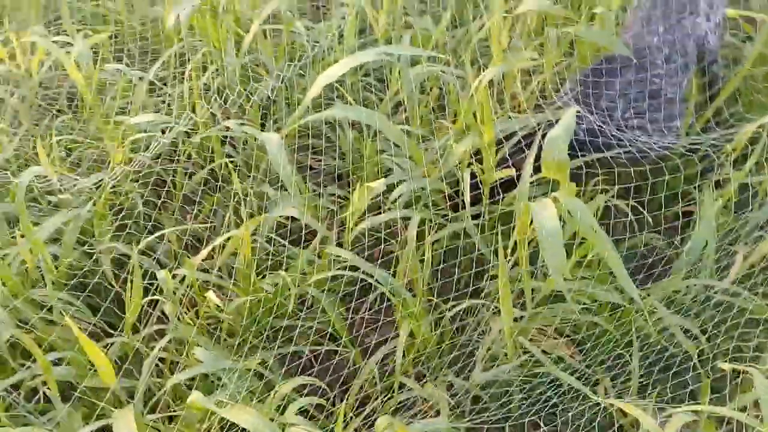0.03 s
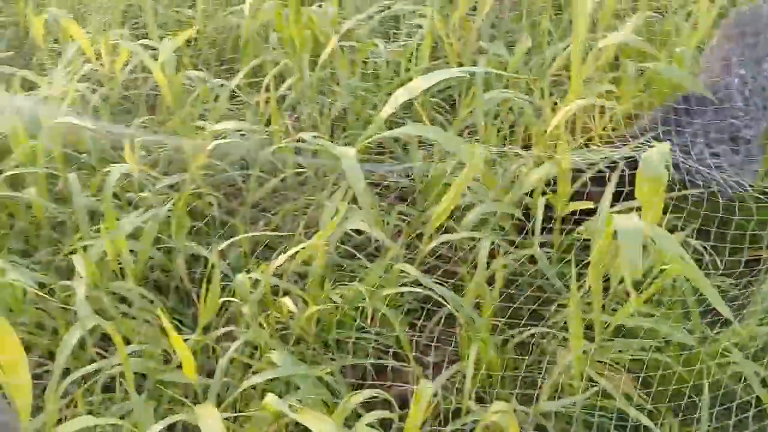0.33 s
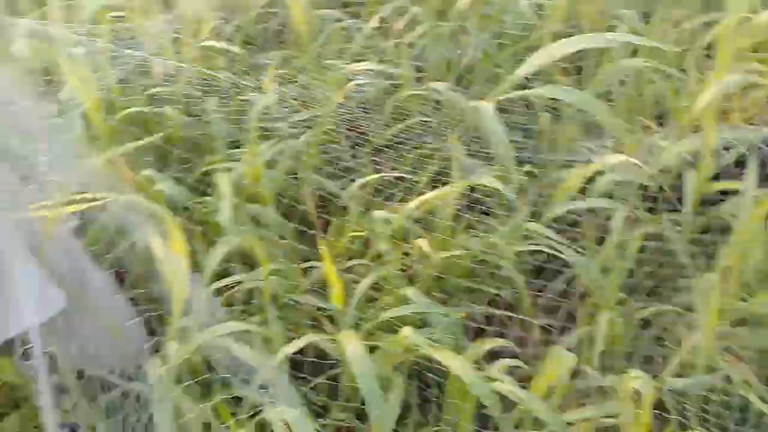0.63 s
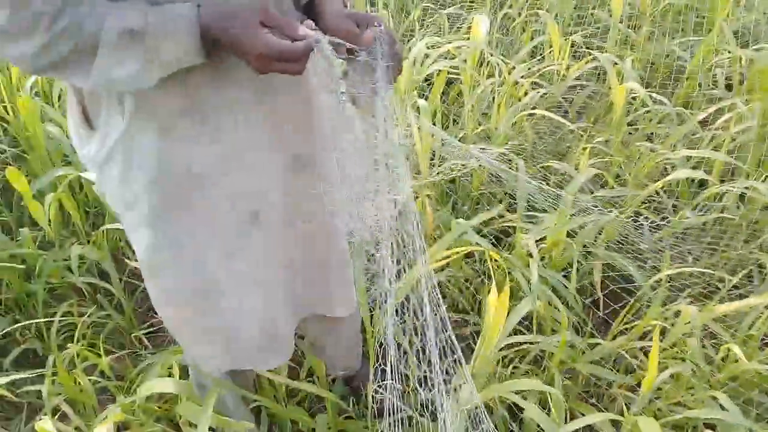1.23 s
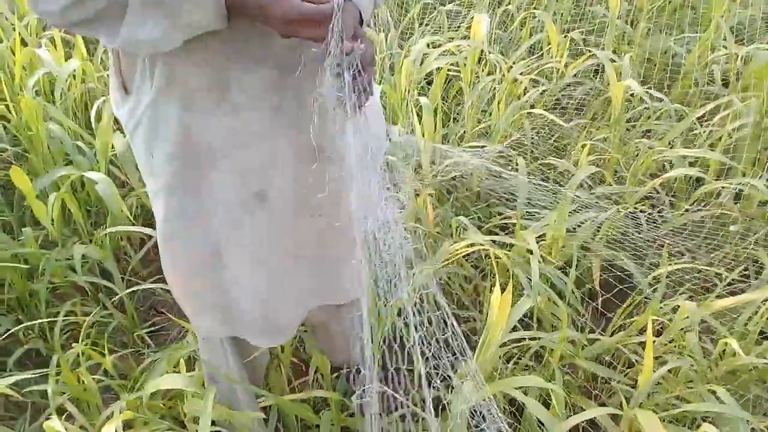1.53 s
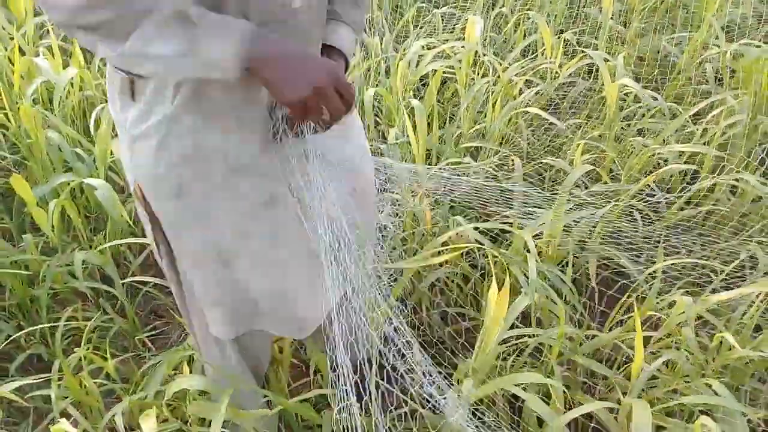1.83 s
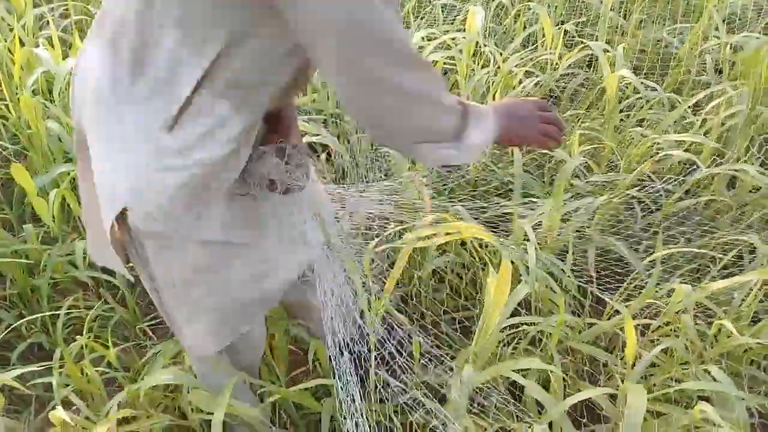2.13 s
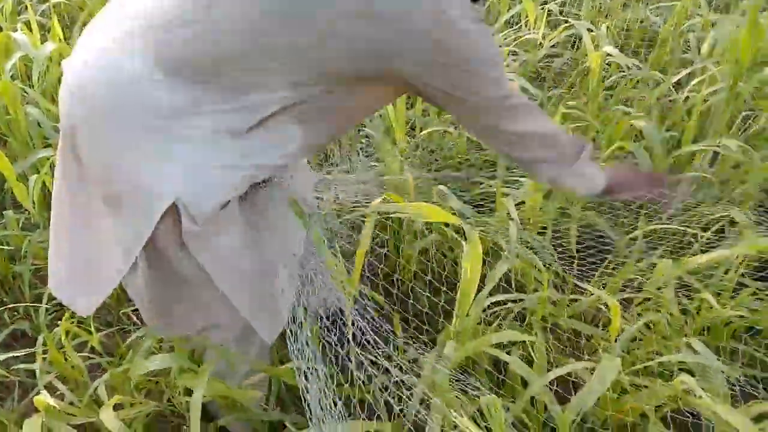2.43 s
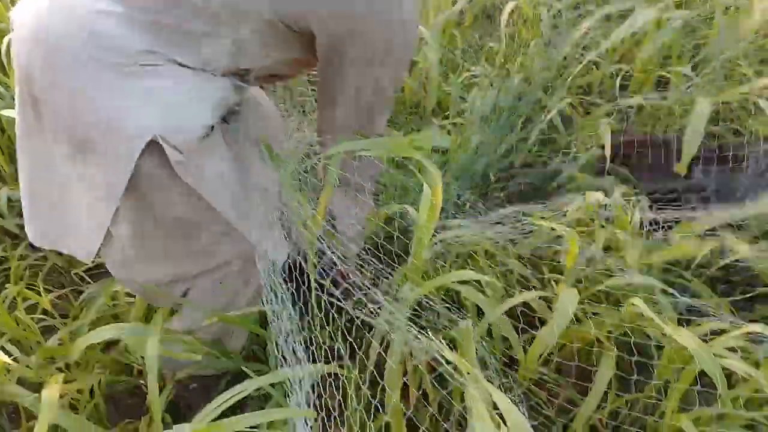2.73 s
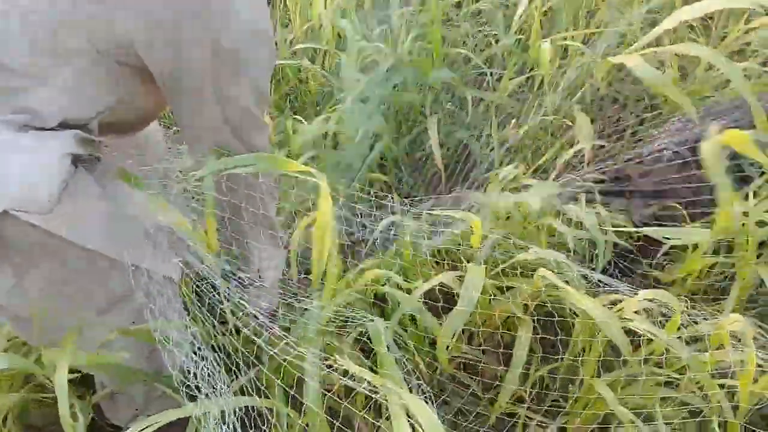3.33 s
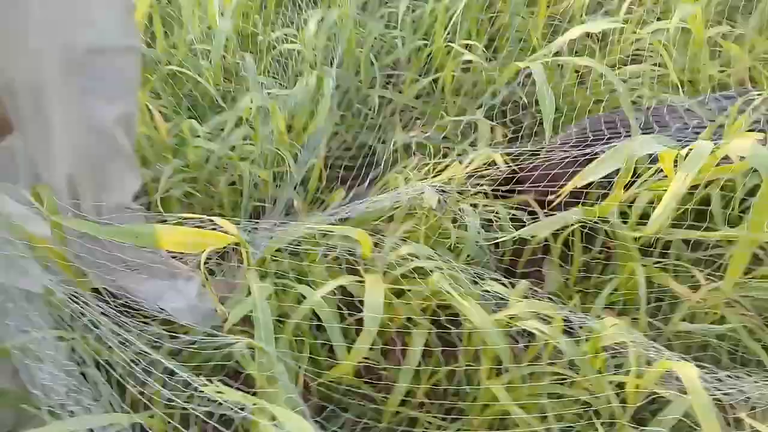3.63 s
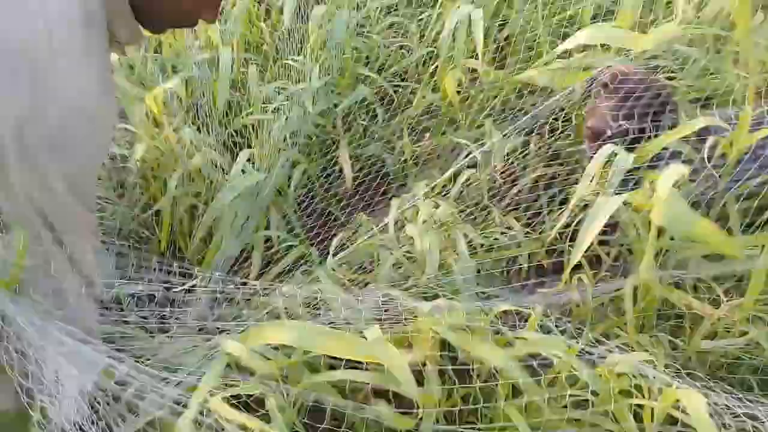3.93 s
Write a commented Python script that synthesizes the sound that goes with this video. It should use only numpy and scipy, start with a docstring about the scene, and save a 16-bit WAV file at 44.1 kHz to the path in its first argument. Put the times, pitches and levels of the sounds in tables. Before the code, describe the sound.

Rustling of a net pulled through young crops, heard close up outdoors. Light scraping and low wind thumps come first, then a quiet moment, a burst of crackling leaves and snapping stems, and a brief sharp rip.

```python
"""A net snags in young grain

A nylon net rubs and flicks over the leaves while a puff of wind buffets the microphone.
After a lull an arm sweeps into the crop: leaves rustle, stalks snap, and the snagged net tears free
in one short loud rip. Rubbing and tearing are many tiny clicks over hiss; thumps are fading tones."""
import sys
import numpy as np
from scipy import signal
from scipy.fft import rfft, irfft, next_fast_len
from scipy.io import wavfile
from scipy.ndimage import map_coordinates

SR = 44100
rng = np.random.default_rng(int(sys.argv[2]) if len(sys.argv) > 2 else 0)


def output_pcm(signal):
    """Save a mono or channel-first signal as 16-bit PCM at the path in sys.argv[1].

    Samples are clipped to [-1, 1] before scaling.
    """
    pcm = np.clip(np.atleast_2d(signal).T, -1, 1) * 32767
    wavfile.write(sys.argv[1], SR, np.round(pcm).astype(np.int16))


N = 176400  # 4 seconds
T = np.arange(N) / SR  # the time of each sample [s]


def amp(db):
    """Turn decibels into a number to multiply a sound by."""
    return 10 ** (np.asarray(db) / 20)


def unit(x):
    """Scale a sound so its average strength (rms) is 1."""
    return x / np.sqrt(np.mean(x ** 2) + 1e-20)


def level(rows, fade_db_per_s=300):
    """A loudness curve through (time [s], level [dB]) points, fading away outside them."""
    times, db = np.transpose(rows)
    seconds_outside = abs(T - np.clip(T, times[0], times[-1]))
    return amp(np.interp(T, times, db) - fade_db_per_s * seconds_outside)


def stroke(start_s, rise_s, hold_s, fall_db_per_s, db):
    """The loudness of one movement: it swells, holds and dies away."""
    seconds_falling = np.maximum(T - start_s - rise_s - hold_s, 0)
    return np.clip((T - start_s) / rise_s, 0, 1) * amp(db - fall_db_per_s * seconds_falling)


def wobble(per_s):
    """A smooth curve through per_s random values each second."""
    return map_coordinates(rng.standard_normal(int(N * per_s / SR) + 4), [T * per_s])


def coloured(x, points):
    """Shape a sound's tone colour through (frequency [Hz], level [dB]) points."""
    size = 2 * next_fast_len(len(x) // 2 + 4096)
    octave = np.log2(np.fft.rfftfreq(size, 1 / SR) + 1)
    hz, db = np.transpose(points)
    knots = np.log2(hz)
    octaves_outside = abs(octave - np.clip(octave, knots[0], knots[-1]))
    gain = amp(np.interp(octave, knots, db) - 24 * octaves_outside)
    # these steps make the filter ring only after a click, never before it
    cepstrum = irfft(np.log(np.maximum(gain, 1e-6)))
    cepstrum[1:size // 2] *= 2
    cepstrum[size // 2 + 1:] = 0
    response = np.exp(rfft(cepstrum))
    return irfft(rfft(x, size) * response, size)[:len(x)]


def noise(colour):
    """Smooth noise with the given tone colour."""
    return unit(coloured(rng.standard_normal(N), colour))


def crackle(colour, slips_per_s, spread_db, rub_db):
    """Tiny slips click, some louder than others, over the hiss of smooth rubbing."""
    sizes = amp(spread_db * np.minimum(rng.exponential(size=N), 4))
    slips = (rng.random(N) < slips_per_s / SR) * sizes * rng.choice([-1, 1], N)
    rubbing = amp(rub_db) * rng.standard_normal(N)
    return unit(coloured(unit(slips) + rubbing, colour))


def thump(start_s, db, hz, ring_s, rise_s):
    """A soft push that swings a few times, fading by 60 dB in ring_s seconds."""
    t = np.maximum(T - start_s, 0)
    swing = np.sin(2 * np.pi * hz * t) * amp(-60 * t / ring_s) * (1 - np.exp(-t / rise_s))
    return amp(db) * swing / abs(swing).max()


def field():
    """A distant rumble lies under the faint hiss of still air."""
    # tone colours of the rumble and the air (frequency [Hz], level [dB])
    rumble_colour = [(25, -10), (45, -5), (80, 0), (150, -6), (190, -17), (280, -22), (400, -22),
                     (550, -29)]
    air_colour = [(300, -2), (800, -3), (1500, 0), (2100, 2), (2900, -9), (3700, -2), (5100, -5),
                  (5800, -16), (7500, -14), (8000, -9), (8400, -1), (9000, -17), (15800, -17)]
    rumble = amp(-59) * noise(rumble_colour)
    air = amp(-67.8 + .7 * wobble(5)) * noise(air_colour)
    return rumble + air


def wind():
    """Swirling air pushes on the microphone: an uneven rumble with a few stronger thumps."""
    # strength of the puff (time [s], relative level [dB])
    puff_levels = [(0, -39), (.04, -48), (.2, -46), (.26, -39), (.45, -36), (.56, -38), (.66, -37),
                   (.72, -41), (.82, -37), (.92, -47), (1.02, -45), (1.1, -58), (1.25, -68)]
    # its deep tone colour (frequency [Hz], level [dB])
    puff_colour = [(20, -12), (45, -1), (90, 1), (140, 0), (210, -6), (300, -16), (420, -26), (600, -41)]
    # single pushes of air (time [s], peak level [dB], pitch [Hz])
    buffets = [(.245, -31, 70), (.382, -24, 100), (.503, -27, 90), (.591, -19.5, 140), (.748, -25, 185),
               (.786, -28, 140), (.848, -30, 130), (1.012, -38, 105)]
    swirl = unit(noise(puff_colour) * amp(2 * wobble(30)))
    puff = amp(-1) * level(puff_levels, fade_db_per_s=100) * swirl
    return puff + sum(thump(*buffet, ring_s=.03, rise_s=.005) for buffet in buffets)


def net():
    """The net drags over leaves, slides over hands and cloth, and is pulled twice through the crop."""
    # loudness of the drag and the slide (time [s], relative level [dB])
    drag_levels = [(0.0, -51), (0.178, -56), (0.312, -51), (0.336, -56), (0.414, -55), (0.45, -47),
                   (0.524, -59), (0.62, -63)]
    slide_levels = [(.45, -75), (.55, -64), (.7, -63.5), (.75, -55), (.92, -60), (1.15, -59), (1.27, -68),
                    (1.45, -80)]
    # the two pulls (start [s], rise [s], hold [s], fall [dB/s], level [dB])
    pull_strokes = [(3.372, .04, .04, 95, -40), (3.855, .05, .04, 60, -38.3)]
    # tone colour of each kind of rubbing (frequency [Hz], level [dB])
    drag_colour = [(300, -10), (420, -7), (600, -10), (900, -10), (1400, -4), (1650, -1), (2200, 1),
                   (2500, -3), (3000, -17), (3700, -9), (4300, -8), (6000, -11), (8400, -26), (10200, -18),
                   (12500, -23), (15800, -23)]
    slide_colour = [(250, -16), (410, 2), (600, -12), (1000, -13), (1500, -1), (2050, 0), (2350, -5),
                    (2700, -20), (3200, -24), (3700, -5), (4600, -8), (6000, -19), (7800, -16), (8400, -15),
                    (9200, -29), (11000, -22), (12300, -29), (14000, -22), (15800, -24)]
    pull_colour = [(120, -6), (220, -6), (350, -8), (500, -11), (700, -8), (1020, -7), (1300, -2),
                   (2000, -1), (3160, -9), (4280, -1), (5980, -14), (7010, -11), (8760, -18), (13900, -16),
                   (15800, -17)]
    drag = amp(-.5) * level(drag_levels) * crackle(drag_colour, slips_per_s=1200, spread_db=4, rub_db=0)
    slide = level(slide_levels) * crackle(slide_colour, slips_per_s=4000, spread_db=3, rub_db=2)
    pulling = sum(stroke(*pull) for pull in pull_strokes)
    pulls = pulling * crackle(pull_colour, slips_per_s=4000, spread_db=3, rub_db=1)
    return (drag + slide + pulls) * amp(.7 * wobble(35))


def flicks():
    """Tight strands scrape over leaves, each a short hiss around one pitch."""
    # flicking strands (time [s], level [dB], pitch [Hz], time to fade by 60 dB [s])
    strands = [(.0825, -41, 4000, .02), (.208, -48, 2200, .07), (.299, -44, 2150, .07),
               (1.708, -61.5, 3600, .07), (1.762, -59.5, 3500, .08)]
    out = np.zeros(N)
    for start_s, db, hz, fade_s in strands:
        band = signal.iirpeak(hz, Q=2, fs=SR)
        hiss = signal.lfilter(*band, rng.standard_normal(N))
        scrape = unit(signal.lfilter(*band, hiss))  # filtering twice narrows the band
        out += stroke(start_s, rise_s=.002, hold_s=0, fall_db_per_s=60 / fade_s, db=db) * scrape
    return out


def leaves():
    """Leaves rub and tick against each other; the sweep of the arm makes a fuller, rougher rustle."""
    # leaves stirred by arm and net (time [s], level [dB])
    stir_levels = [(1.9, -76), (2.1, -64), (2.2, -56), (2.32, -54.5), (2.45, -51), (2.5, -43), (2.76, -42),
                   (2.84, -44.5), (2.92, -48.5), (3.02, -46.5), (3.13, -48.5), (3.25, -53), (3.36, -54),
                   (3.5, -52), (3.6, -52), (3.66, -48), (3.78, -45), (3.84, -48), (4.0, -49)]
    # tone colours of the stirring and the sweep (frequency [Hz], level [dB])
    stir_colour = [(120, -4), (200, -4), (300, -7), (420, -11), (560, -13), (700, -9), (958, -7),
                   (1210, -7), (1680, -2), (2090, 1), (2700, -4), (3250, -11), (3860, -5), (4480, -6),
                   (6000, -17), (9000, -19), (10100, -18), (15800, -19)]
    sweep_colour = [(29, -43), (50, -13), (91, -2), (378, -6), (470, -12), (627, -5), (690, -7), (922, -3),
                    (1350, -5), (2090, 0), (4200, -8), (8650, -19), (15800, -20)]
    stirring = level(stir_levels) * amp(.6 * wobble(40))
    stir = stirring * crackle(stir_colour, slips_per_s=3000, spread_db=3, rub_db=1)
    arm = stroke(start_s=2.485, rise_s=.085, hold_s=.11, fall_db_per_s=95, db=-33)
    sweep = arm * amp(.9 * wobble(70)) * crackle(sweep_colour, slips_per_s=3000, spread_db=3, rub_db=0)
    return stir + sweep


def knocks():
    """The hand lands and the stems spring back with dull knocks."""
    # blows on ground and stems (time [s], relative peak [dB], pitch [Hz], time to fade by 60 dB [s])
    blows = [(2.7203, -20.5, 200, .012), (3.7325, -26, 550, .025), (3.747, -41, 680, .08)]
    thumps = sum(thump(*blow, rise_s=.002) for blow in blows)
    return coloured(thumps, [(60, -14), (200, 0), (3000, 0)])  # thin out the deep bass


def snaps():
    """Stalks and mesh snap: one sharp break, then a short splintering as the fibres give way."""
    # the breaks (time [s], peak level [dB], treble limit [Hz], relative splintering level [dB])
    breaks = [(.4455, -28, 14000, -15), (.455, -31, 13000, -18), (1.067, -48, 2500, -8),
              (2.516, -25, 5000, -10), (2.534, -25, 5000, -4), (2.541, -26, 5000, -4),
              (2.567, -21, 4000, -11), (2.589, -12.5, 9000, -13), (2.614, -20, 4000, -9),
              (2.633, -18, 6000, -15), (2.667, -19, 13000, -12), (2.699, -24, 4000, -8),
              (2.8815, -33, 4000, -12), (2.9603, -10, 3900, -16.5), (3.0955, -27, 12000, -6),
              (3.108, -22, 13000, -8), (3.139, -33, 6000, -12), (3.7285, -14, 2500, -9),
              (3.9815, -26, 5000, -18)]
    # tone colour of a snap (frequency [Hz], level [dB])
    snap_colour = [(150, -22), (500, -18), (950, -2), (1400, -1), (2000, 0), (3000, -6), (4200, 0),
                   (6000, -11), (9000, -10), (15800, -5)]
    splinter_fade_s = .035
    out, t = np.zeros(N + SR), T[:SR // 16]
    for start_s, db, treble_hz, splinter_db in breaks:
        force = amp(splinter_db - 60 * t / splinter_fade_s) * rng.standard_normal(len(t)) / 2
        force[0] = 1  # the break itself
        soften = signal.butter(2, treble_hz, fs=SR)
        click = signal.lfilter(*soften, coloured(force, snap_colour))
        out[round(start_s * SR):][:len(t)] += amp(db) * click / abs(click).max()
    return out[:N]


def rip():
    """The net tears through stems in a rush of tiny breaks, then the freed net shakes and strums low."""
    # tone colours of the rip's high, middle and low parts and the net's shaking (frequency [Hz], level [dB])
    hiss_colour = [(3000, -20), (4200, -3), (6000, -15), (9000, -10), (9900, -1), (11000, 1), (12100, -13),
                   (13700, 1), (15800, -9)]
    body_colour = [(900, -30), (1350, -11), (1620, -2), (1780, -5), (2020, 1), (2450, -5), (2900, -13),
                   (3600, -15), (4000, -8), (4600, -13), (5800, -30), (8000, -50)]
    crunch_colour = [(110, -30), (200, -10), (400, -6), (550, 0), (760, -9), (1000, 3), (1300, -5),
                     (2000, -30)]
    shake_colour = [(90, -6), (220, -1), (380, 0), (600, -2), (1100, -4)]
    shake = stroke(start_s=3.74, rise_s=.01, hold_s=.03, fall_db_per_s=45, db=-54) * noise(shake_colour)
    # the lower parts swell more slowly, so the rip starts bright and darkens
    hiss = stroke(start_s=3.6958, rise_s=.001, hold_s=.022, fall_db_per_s=60 / .085, db=-26.5)
    body = stroke(start_s=3.695, rise_s=.007, hold_s=.014, fall_db_per_s=800, db=-18)
    crunch = stroke(start_s=3.694, rise_s=.015, hold_s=.027, fall_db_per_s=1000, db=-28)
    tear = np.zeros(N)
    for loudness, colour in [(hiss, hiss_colour), (body, body_colour), (crunch, crunch_colour)]:
        tear += loudness * crackle(colour, slips_per_s=1800, spread_db=1.5, rub_db=-6)
    return tear + shake


def scene():
    """All the sounds add up at one microphone in the open."""
    return (field() + wind() + net() + flicks() + leaves() + knocks() + snaps() + rip())[None]


def record(dry):
    """The very highest treble is cut away."""
    top_hz = 15900
    size = next_fast_len(N + SR // 2)
    kept = np.fft.rfftfreq(size, 1 / SR) < top_hz
    return irfft(rfft(dry, size) * kept, size)[:, :N]


dry = scene()
out = record(dry)
output_pcm(out)
```